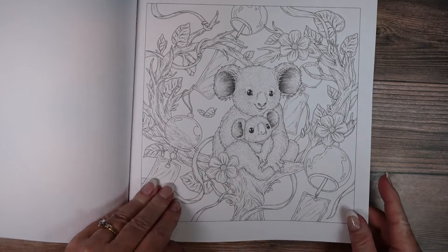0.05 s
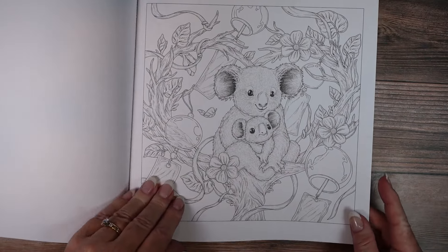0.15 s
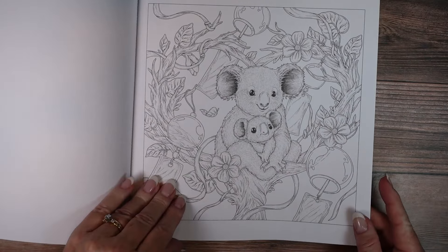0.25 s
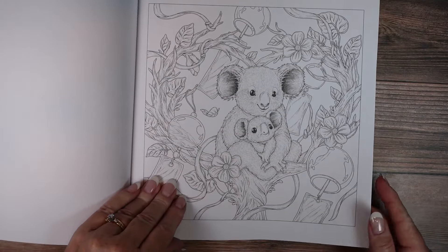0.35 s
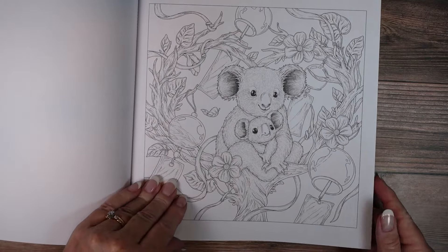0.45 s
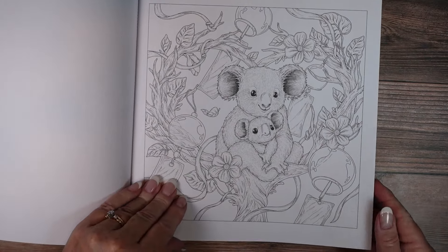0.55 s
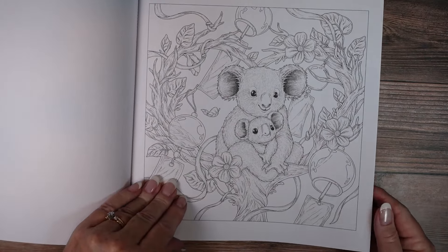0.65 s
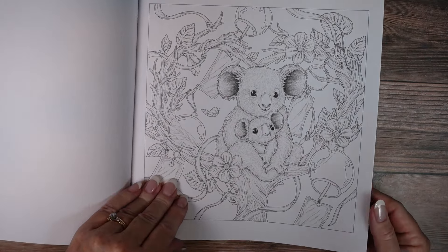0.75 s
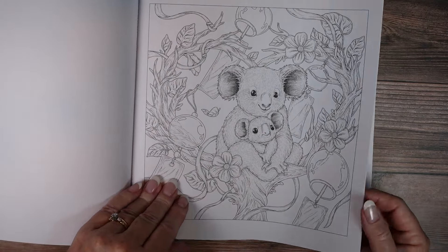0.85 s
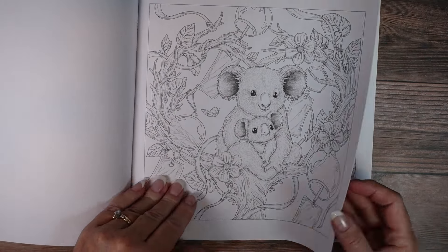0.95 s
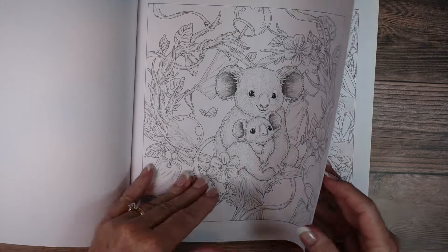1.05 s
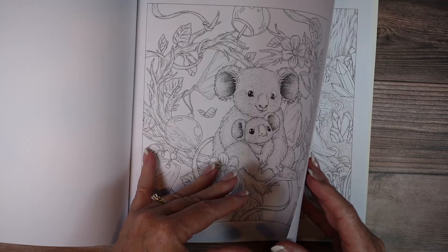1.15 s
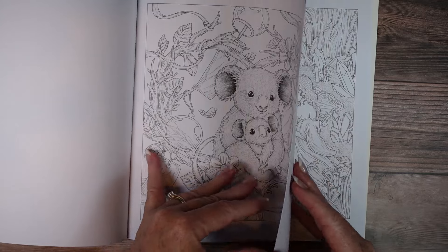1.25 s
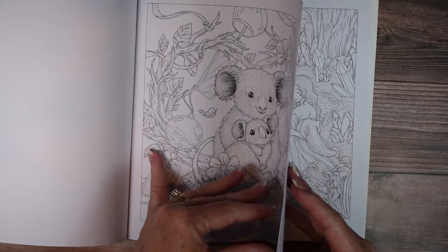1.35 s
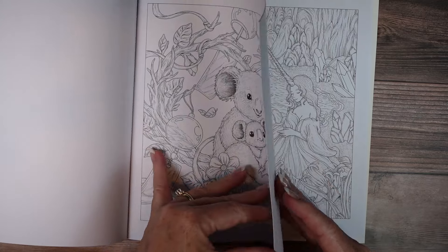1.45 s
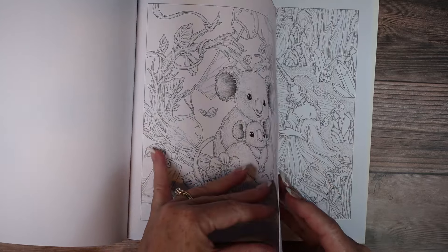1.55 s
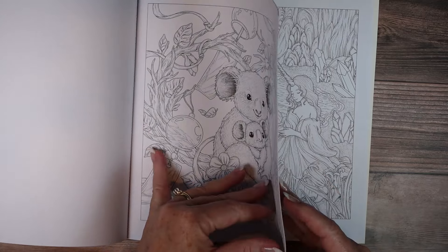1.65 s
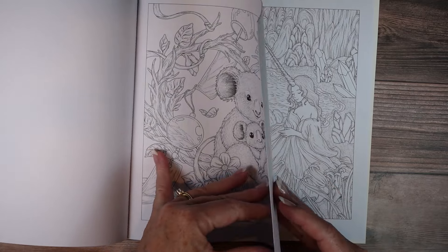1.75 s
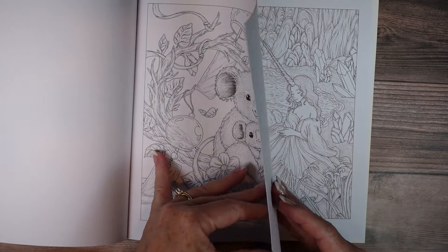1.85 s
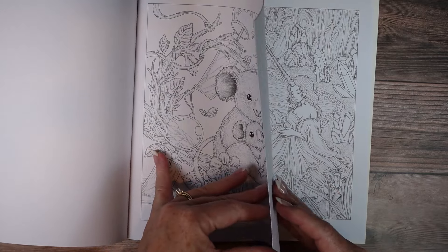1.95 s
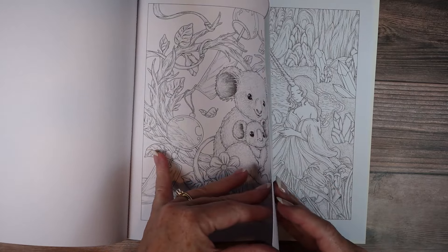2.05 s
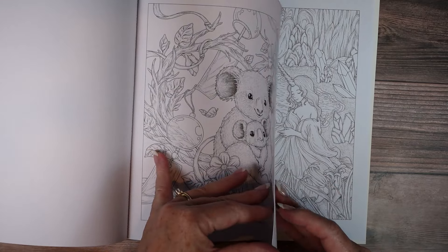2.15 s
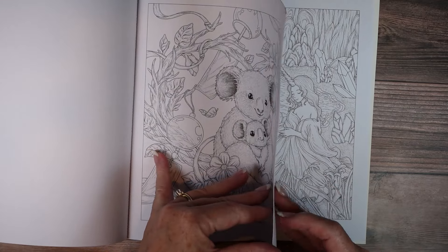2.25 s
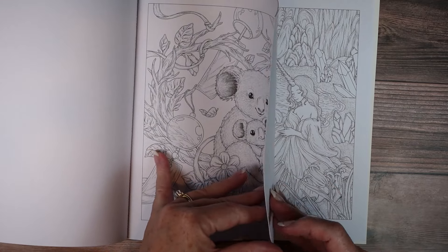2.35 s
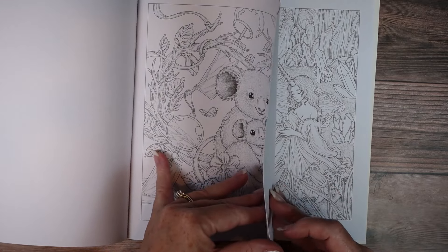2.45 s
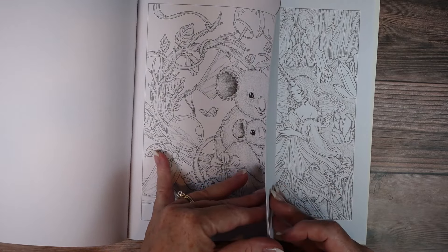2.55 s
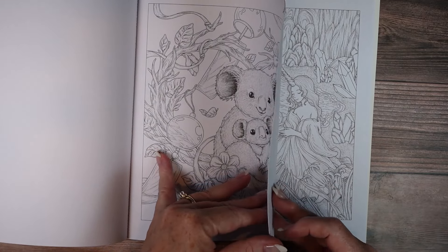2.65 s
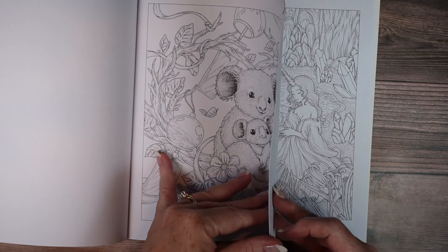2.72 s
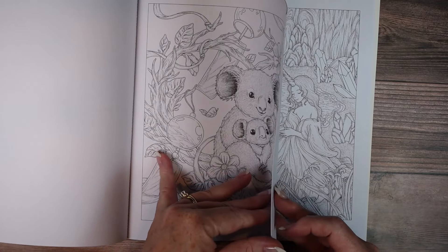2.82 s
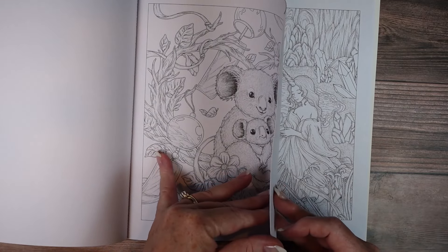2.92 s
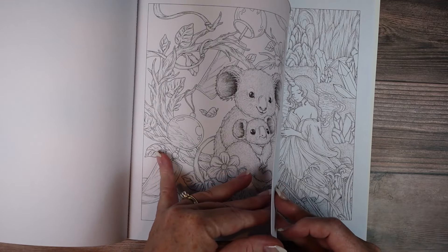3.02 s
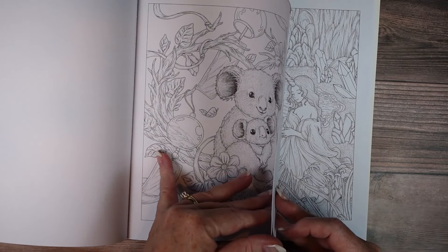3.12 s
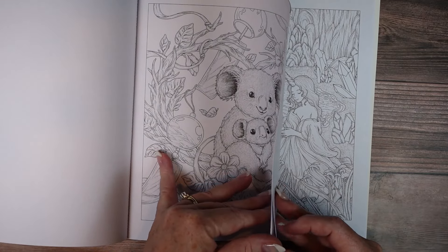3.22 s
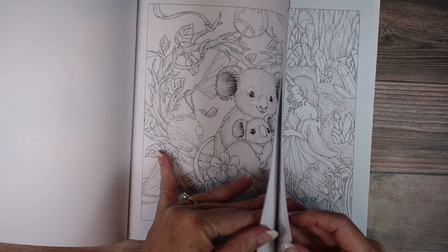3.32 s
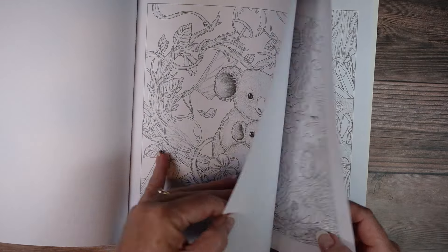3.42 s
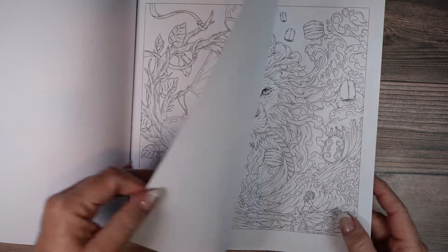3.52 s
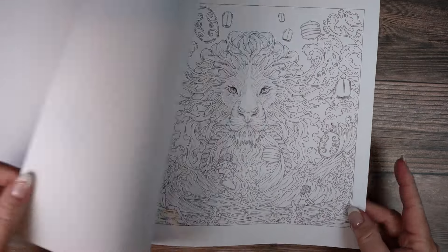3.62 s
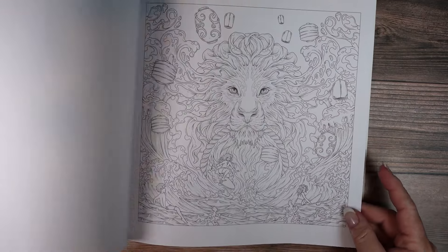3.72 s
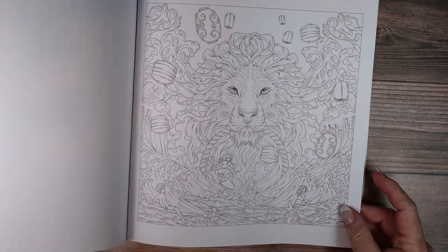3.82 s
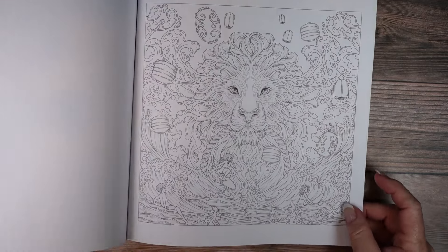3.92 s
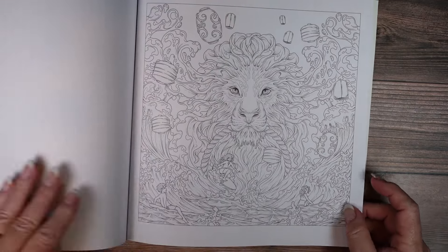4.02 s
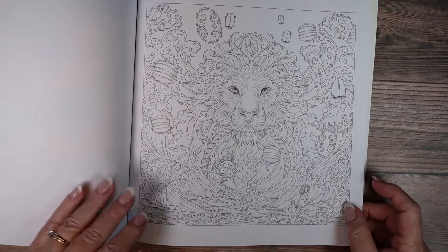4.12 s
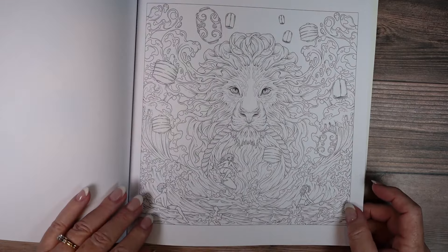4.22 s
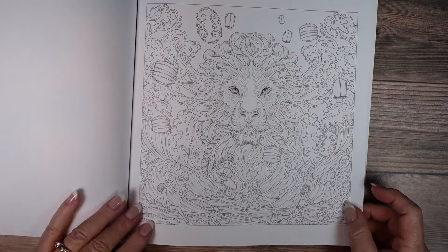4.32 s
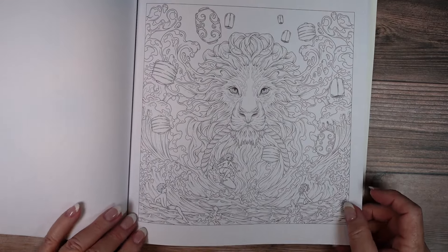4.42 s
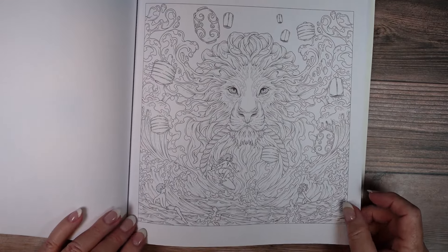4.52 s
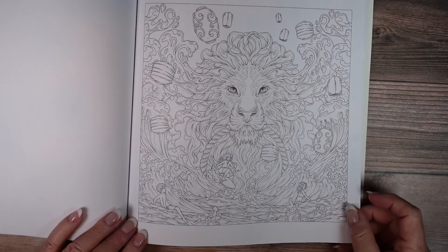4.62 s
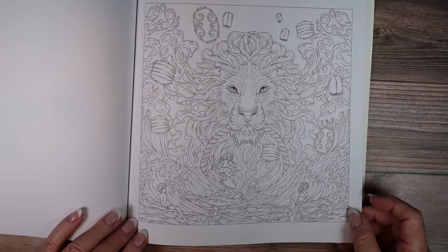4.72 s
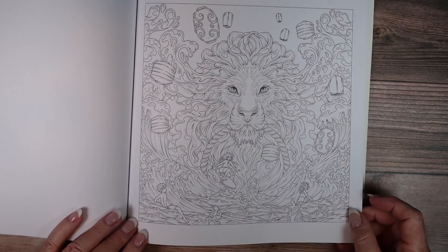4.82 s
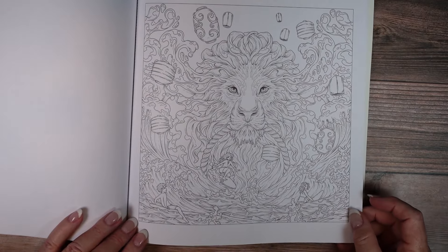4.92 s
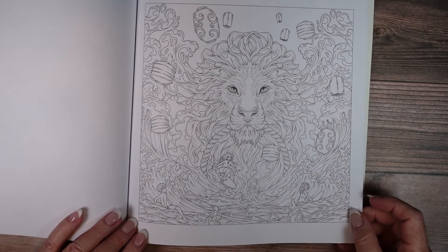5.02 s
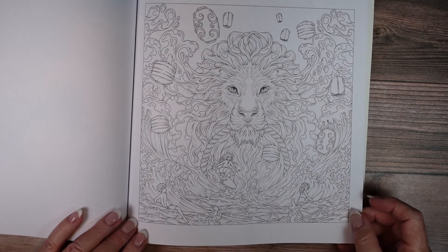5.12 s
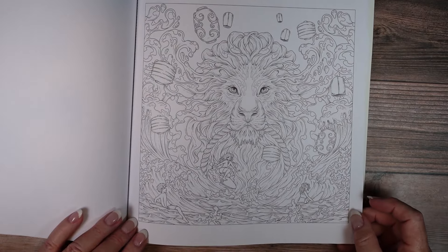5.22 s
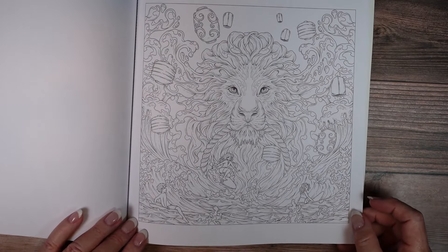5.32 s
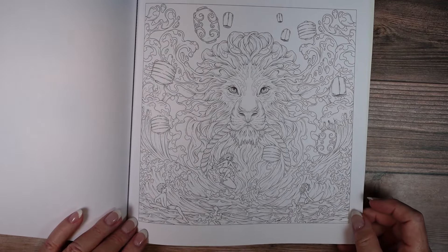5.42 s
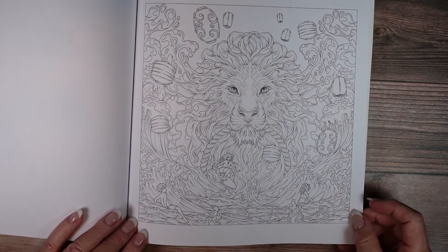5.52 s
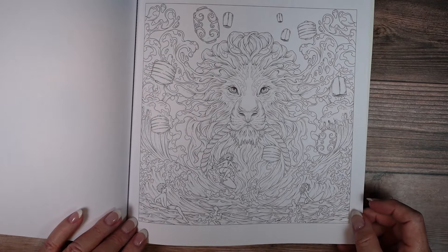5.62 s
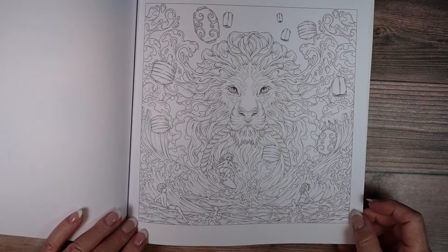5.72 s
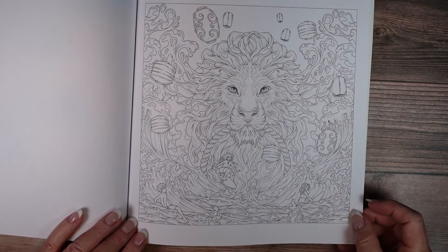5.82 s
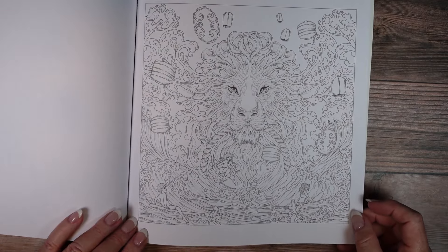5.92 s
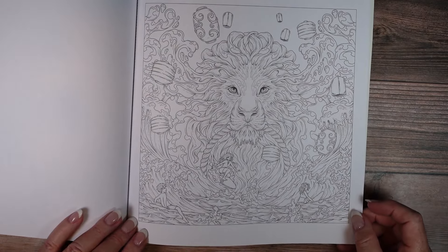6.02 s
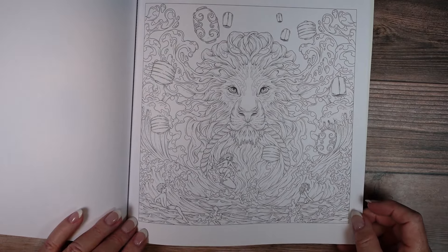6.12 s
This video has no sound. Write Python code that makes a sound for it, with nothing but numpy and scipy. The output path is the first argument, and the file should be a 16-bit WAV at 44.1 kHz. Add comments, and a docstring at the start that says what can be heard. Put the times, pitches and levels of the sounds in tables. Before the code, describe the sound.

A quiet small room, closely miked in stereo, with very faint hiss, thin distant machine tones and a low hum that swells and breaks off repeatedly. At 0.05 s there is a soft dull touch on the book, then almost nothing until about 0.9 s. From 0.95 to 1.4 s a page lifts in smooth, dry swishes. Between 1.4 and 2.9 s fingers part the sheets with small irregular rubs, crinkles and ticks, the crispest near 1.63 and 1.72 s. It is nearly still around 3 s. At 3.35-3.5 s the page turns in the loudest bright rustle, with a hard snap at 3.42 s. Softer sliding follows, then a sharp bright crack at 3.87 s. Airy smoothing strokes run from 4.0 to 4.7 s, with a muted tap near 4.27 s. After that only faint hiss and hum remain, with barely audible ticks around 5.1-5.3 s, until 6.1 s.

```python
"""At a wooden table in a quiet room, hands lift, part and turn the pages of a large paper book, close up.
Fingers and sheets slide as filtered noise, creases snap as short noise cracks,
and the book knocks on the table as decaying low rings.
Behind them lie shaped noise hiss, a low hum that swells and breaks off, and thin wavering tones."""
import sys
import numpy as np
from scipy import signal
from scipy.fft import rfft, irfft
from scipy.io import wavfile
from scipy.ndimage import uniform_filter1d

SR = 44100
rng = np.random.default_rng(int(sys.argv[2]) if len(sys.argv) > 2 else 0)


def store_wav(level_fs):
    """Save 16-bit WAV to argv[1]."""
    pcm = np.round(np.clip(np.atleast_2d(level_fs), -1, 1) * 32767)
    wavfile.write(sys.argv[1], SR, pcm.T.astype(np.int16))


N = 271656


def gain_of(db):
    """Amplitude factor for a level in dB."""
    return 10 ** (np.asarray(db) / 20)


def evened(x):
    """Scale to an RMS of 1."""
    return x / np.sqrt(np.mean(x ** 2) + 1e-20)


def read(points, hz):
    """Read a curve over frequency, with straight lines on a log-frequency axis."""
    f, value = np.transpose(points)
    return np.interp(np.log(hz + 1), np.log(f + 1), value)


def add(mix, start_s, sound):
    """Lay a sound into the mix at its start time, cut off at the end of the mix."""
    part = mix[round(start_s * SR):][:len(sound)]
    part += sound[:len(part)]


def resonate(x, hz, width_hz):
    """A two-pole resonance of gain 1 at its centre."""
    return signal.lfilter(*signal.iirpeak(hz, hz / width_hz, SR), x)


# Colour of the room hiss: (frequency [Hz], relative level per Hz [dB])
HISS_COLOUR = [(19, -46), (32, -11), (150, -2.5), (383, -6.5), (472, -6), (524, -5.5), (597, -0.5),
               (681, -1.5), (1090, -10), (1240, -6.5), (1450, -9.5), (1890, -10.5), (4830, -19),
               (14500, -25), (16500, -36.5)]
# Stereo likeness of the hiss: (frequency [Hz], left-right correlation [0 to 1])
HISS_LIKENESS = [(60, 1), (180, 0.57), (550, 0.08), (1650, 0.047), (4970, 0.054), (15000, 0.21)]
HISS_DB = -64  # RMS level


def hiss():
    """Room hiss: random short-time spectra with faint drifting patches, partly alike on both sides."""
    frames, hz = N // 512 + 5, np.fft.rfftfreq(2048, 1 / SR)
    a, b, c, d, patches = rng.standard_normal((frames, 1025, 5)).T
    patches = uniform_filter1d(patches, size=20, axis=0)  # across frequency
    patches = evened(uniform_filter1d(patches, size=10, axis=1))  # across time
    likeness = np.clip(read(HISS_LIKENESS, hz), -1, 1)[:, None]
    left = a + 1j * b
    right = likeness * left + np.sqrt(1 - likeness ** 2) * (c + 1j * d)
    spectra = np.array([left, right])
    spectra *= gain_of(read(HISS_COLOUR, hz)[:, None] + 0.6 * patches)
    noise = signal.istft(spectra, nperseg=2048, noverlap=1536)[1][:, :N]
    return gain_of(HISS_DB) * evened(noise)


# Swells of the low hum: (start [s], end [s], level grown to by the end, before waver [dB RMS])
HUM_SWELLS = [(.17, 0.748, -65.5), (.83, 1.0, -61), (1.07, 1.19, -65.5), (1.3, 1.807, -72),
              (1.84, 2.38, -66), (2.5, 2.8, -77.5), (2.85, 3.61, -66), (3.83, 3.9, -59.5),
              (3.95, 4.442, -63.5), (4.55, 4.98, -67), (5.04, 5.638, -62.5), (5.7, 6.1, -79)]
# Faint tones of some far machine: (frequency [Hz], bandwidth [Hz], level [dB RMS])
MACHINE_TONES = [(152, 6.6, -83.5), (206.3, 12.6, -81.5), (477, 4.1, -79.5), (602, 3.4, -78),
                 (1224, 2.5, -83), (10900, 142, -90.5)]
HUM_HZ, GROW_DB = 105.3, 5.5  # mean pitch; growth over each swell
SWELL_S, BREAK_S = 0.04, 0.055  # linear fades, centred on the start and the end
WAVER_DB, WAVER_HZ = 2.1, 1.8  # RMS wander of level and pitch


def slow_wander():
    """Noise smoothed twice, drifting slowly at an RMS of 1."""
    once = uniform_filter1d(rng.standard_normal(N), size=3000)
    return evened(uniform_filter1d(once, size=3000))


def hum():
    """A wavering low sine that swells and breaks off, plus narrow noise tones, alike on both sides."""
    now = np.arange(N) / SR
    drift, waver = slow_wander(), slow_wander()
    level = np.zeros(N)
    for start, end, end_db in HUM_SWELLS:
        left_to_grow = (end - np.clip(now, start, end)) / (end - start)
        fade_in = np.clip((now - start) / SWELL_S + 0.5, 0, 1)
        break_off = np.clip((end - now) / BREAK_S + 0.5, 0, 1)
        level += gain_of(end_db - GROW_DB * left_to_grow) * fade_in * break_off
    phase = 2 * np.pi * np.cumsum(HUM_HZ + WAVER_HZ * drift) / SR
    low = np.sqrt(2) * level * gain_of(WAVER_DB * waver) * np.sin(phase)
    thin = np.zeros(N)
    for hz, width_hz, db in MACHINE_TONES:
        thin += gain_of(db) * evened(resonate(rng.standard_normal(N), hz, width_hz))
    return low + thin


# Decay of the room: (frequency [Hz], time to fall 60 dB [s])
ROOM_DECAY = [(200, 0.18), (1000, .15), (4000, 0.12), (12000, 0.12)]


def room(x):
    """Reverb: sparse taps of random sign, separate for each side, each band dying at its own speed."""
    taps = np.zeros((2, SR // 2))
    slots = np.arange(120, SR // 2 - 20, 20)  # one tap in every 20 samples
    positions = slots + rng.integers(0, 20, (2, len(slots)))
    signs = rng.choice([-1.0, 1.0], (2, len(slots)))
    np.put_along_axis(taps, positions, signs, 1)
    hz, t, z = signal.stft(taps, SR, nperseg=256)
    decay = gain_of(-60 * t / read(ROOM_DECAY, hz)[:, None])
    tail = signal.istft(z * decay, SR, nperseg=256)[1]
    mono = x.mean(0)[None]
    return signal.fftconvolve(mono, tail / np.linalg.norm(tail[0]), axes=1)[:, :N]


# Fingertips and sheets knocking the hollow under the book:
# (time [s], relative level [dB], pitch [Hz], time to fall 60 dB [s])
KNOCK_HITS = [(.02, -60, 337, 0.039), (0.056, -24.5, 701, 0.047), (0.809, -48, 1583, 0.094),
              (1.027, -44, 690, 0.047), (1.634, -51, 384, 0.12), (1.83, -53.5, 710, 0.08),
              (2.126, -42.5, 640, 0.041), (2.128, -52, 378, 0.058), (2.3, -50, 370, 0.056),
              (2.311, -40.5, 661, 0.056), (2.452, -54.5, 797, 0.1), (2.612, -45, 747, 0.062),
              (2.736, -33, 793, 0.023), (3.095, -50, 642, 0.057), (3.245, -43, 780, 0.028),
              (3.336, -32, 660, 0.043), (3.344, -53.5, 228, .07), (3.52, -53.5, 368, 0.091),
              (3.86, -44.5, 172, 0.09), (3.872, -50, 349, 0.12), (3.875, -45.5, 554, 0.064),
              (4.263, -34, 623, 0.052), (4.297, -37, 648, 0.028), (4.603, -54, 637, .04)]


def knocks():
    """Soft blows on the hollow: each swells over a few milliseconds, then rings as sine and narrow noise."""
    out, t = np.zeros(N), np.arange(8192) / SR
    noises = rng.standard_normal((len(KNOCK_HITS), 8192))
    for (time_s, db, hz, t60), noise in zip(KNOCK_HITS, noises):
        rough = evened(resonate(resonate(noise, hz, 0.35 * hz), hz, 0.35 * hz))
        ring = np.sin(2 * np.pi * hz * t) + 0.45 * rough
        swell = 1 - np.exp(-(t / 0.0033) ** 2)
        decay = gain_of(db + 0.5 - 60 * t / max(t60, 0.01))
        add(out, time_s - 0.003, decay * swell * ring)  # the swell starts 3 ms early
    return out


# Rings and a few shallow dips in the colour of the open book, shared by slides and snaps:
# (frequency [Hz], width at half the lift or dip [Hz], relative lift, negative for a dip [dB])
BOOK_COLOUR = [(643, 130, 0.5), (770, 77, 5.5), (1294, 86, 6), (1620, 65, -1.5), (1936, 43, 3.5),
               (2310, 60, 4), (2820, 36, 8), (3454, 140, 5), (3750, 380, 2.5), (4000, 110, 3),
               (4440, 120, -1.5), (4570, 200, 1), (5300, 200, -1), (6720, 690, 3), (7200, 300, 2),
               (8080, 270, 3.5), (9130, 560, 1.5)]


def book_db(hz):
    """Colour of the open book in dB: the sum of its rounded peaks and dips."""
    return sum(db / (1 + (2 * (hz - f) / width) ** 2) for f, width, db in BOOK_COLOUR)


# Creases snapping and sheets slipping free: (time [s], relative level [dB], pitch [Hz],
# spread [octaves], relative treble [dB], crack decay constant [s])
CREASE_SNAPS = [(0.0444, -33.5, 1600, 0.81, 2, 0.016), (1.4304, -36, 5180, 0.45, -21, 0.0073),
                (1.613, -25, 2370, 0.25, -20, 0.0025), (1.6315, -18.5, 2400, 0.23, -33, 0.012),
                (1.6355, -20, 2820, 0.19, -32, 0.0028), (1.7156, -22.5, 3640, 0.19, -26, 0.005),
                (1.832, -35, 3530, 0.28, -14, 0.009), (1.99, -33.5, 5240, 0.14, -30, 0.0079),
                (2.123, -34, 3890, 0.4, 0, 0.006), (2.442, -51, 5500, 0.39, -15, 0.032),
                (2.5645, -38.5, 7980, 0.55, -24, 0.015), (2.614, -40, 5900, 0.53, -15, 0.0044),
                (2.703, -35, 2970, 0.25, -8, 0.0032), (2.7357, -26.5, 1860, 0.7, -17, 0.0056),
                (2.863, -41, 8040, 0.56, -20, 0.021), (3.094, -31.5, 2760, 0.69, -24, 0.0094),
                (3.242, -42, 2950, 0.7, -16, 0.0054), (3.3972, -19, 5000, 0.6, -10, 0.0046),
                (3.4178, -8, 2840, 0.55, -36, 0.0042), (3.473, -27, 3580, 0.12, -24, 0.013),
                (3.7055, -29.5, 1940, 0.49, -17, 0.004), (3.8703, -4.5, 5500, 0.45, 4, 0.0025),
                (3.875, -6.5, 3720, 0.23, -13, 0.0048), (3.948, -26.5, 3450, 0.7, -12, 0.013),
                (5.084, -47.5, 2200, 0.12, -25, 0.011), (5.115, -49.5, 2410, 0.069, -43, 0.024),
                (5.292, -47, 2300, 0.17, -40, 0.011)]


def snaps(tail_db=-26.5, tail_s=0.0087):
    """A crease gives way: a short crack of noise around its pitch, then the sheet shivers out."""
    out, t, hz = np.zeros(N), np.arange(4096) / SR, np.fft.rfftfreq(4096, 1 / SR) + 1
    noises = rng.standard_normal((len(CREASE_SNAPS), 4096))
    for (time_s, db, pitch_hz, octaves, treble_db, length_s), noise in zip(CREASE_SNAPS, noises):
        around = np.exp(-0.5 * (np.log2(hz / pitch_hz) / max(octaves, 0.05)) ** 2)
        around += 0.26 / (1 + (900 / hz) ** 4)  # broad floor above the lows
        body = around / (1 + (hz / 7500) ** 6)
        bright = 2.4 * gain_of(treble_db) / (1 + (6000 / hz) ** 6) * (7000 / hz) ** 1.65
        colour = (body + bright) * gain_of(1.6 * book_db(hz))
        crack = evened(irfft(rfft(noise) * colour))
        fade = np.exp(-t / max(length_s, 0.0005)) + gain_of(tail_db) * np.exp(-t / tail_s)
        attack = np.minimum(t / 0.000427, 1)
        add(out, time_s, gain_of(db - 12) * crack * fade * attack)
    return out


# Colour of sliding paper: (frequency [Hz], relative level per Hz [dB])
PAPER_COLOUR = [(320, -35), (540, -12), (806, -12), (985, -10.5), (3670, -4.5), (5480, -4), (9310, -7.5),
                (15100, -14.5), (15800, -20), (16500, -49.5)]
# Strokes of fingers and sheets; the four band levels are relative to the body band:
# (peak time [s], rise from -10 dB [s], fall to -10 dB [s], relative level [dB], boom [dB],
#  sheet flutter [Hz], low band [dB], air gap ring [Hz], upper band [dB], treble [dB])
HAND_STROKES = [(0.01, 0.022, 0.071, -61.5, 3.5, 2010, -5, 6350, -2, 1),
                (0.055, 0.014, 0.035, -55.5, 7, 1980.0, 3.5, 6100, 1.5, -1.5),
                (0.17, 0.093, 0.19, -64.5, -0.5, 1960.0, -4, 6300, 1.0, 2),
                (0.608, 0.3, 0.046, -83.5, -15, 1530, 16.5, 5300.0, 1, 2.0),
                (0.661, 0.083, 0.13, -79, 1, 1520, 10, 6340, 7, 7.5),
                (0.801, 0.021, 0.065, -77.5, 4, 1560, 16.5, 6100.0, 12.5, 7.5),
                (0.942, 0.05, 0.066, -55.5, -12.5, 1600, 2.5, 5700.0, -1, -4),
                (1.024, 0.07, 0.13, -55.5, -10.5, 2370, -1, 6040, -3, 0.5),
                (1.1, 0.027, 0.064, -47, -32, 2320, -11, 4930, -2.5, -5.5),
                (1.16, 0.044, 0.034, -52, -26, 2300, -9, 4870.0, -3.5, -10),
                (1.225, 0.049, 0.025, -48.5, -25, 2600.0, -14, 5300, -4.5, -10.5),
                (1.275, 0.034, 0.042, -58, -20.0, 2600.0, -7, 5200.0, -2, -5),
                (1.334, 0.017, 0.013, -54, -18, 2690.0, -14, 5000, 1.5, -11),
                (1.371, 0.031, 0.046, -56.5, -17, 1860, -11, 5400, 4.5, -7),
                (1.445, 0.0078, 0.054, -54.5, -10.5, 2260.0, -7, 5100, 1.5, -7),
                (1.519, 0.0067, 0.045, -53, -11.5, 2240, -13, 5140, -3.5, -12),
                (1.591, 0.062, 0.063, -59.5, -6.0, 2390.0, -7.0, 5250, 7, -8),
                (1.636, 0.034, 0.034, -48, -3, 2360, 1, 5250.0, 2, -8.5),
                (1.716, 0.037, 0.065, -48.5, -6, 1910, -0.5, 5300.0, 2, -6),
                (1.835, 0.012, 0.059, -58.5, -1.5, 1650.0, -6.5, 5320.0, 0.0, -6.5),
                (1.889, 0.022, 0.016, -62.5, -4, 1700.0, -4.5, 5280.0, 12, -4),
                (1.954, 0.046, 0.028, -56.5, -17.5, 1850, -14, 5300.0, -1.5, -14),
                (1.988, 0.014, 0.077, -64.5, 2.5, 1860, -1.5, 5400, 4.5, -5.0),
                (2.066, 0.01, 0.04, -60.5, -21, 1600.0, -7, 5430, 4.5, -7),
                (2.12, 0.043, 0.037, -54.5, -8, 1580, -9, 5540, 1.5, -4),
                (2.183, 0.022, 0.053, -63.5, -5, 1700.0, -9, 6400.0, -3, -7),
                (2.284, 0.042, 0.053, -56, -9, 1800.0, -10.5, 5660, 4.5, -2),
                (2.321, 0.01, 0.038, -54.5, -0.5, 1460.0, -12, 5800, 5.0, -3.0),
                (2.38, 0.011, 0.044, -63.5, -9, 1810.0, -10, 5790.0, -1, -6),
                (2.453, 0.02, 0.017, -62.5, 1, 1960.0, -3, 5660.0, 4.5, -10),
                (2.502, 0.012, 0.024, -59, -12, 1790, -8, 5380, -0.5, -5.5),
                (2.54, 0.05, 0.17, -66.5, -9, 1460.0, -8, 5800, -7, -6),
                (2.616, 0.005, 0.043, -62, 3, 1960.0, 0, 5790.0, 7, -5),
                (2.65, 0.037, 0.043, -61.5, 1.5, 1900, -0.5, 5760, 5.5, -1),
                (2.74, 0.0091, 0.026, -54.5, -1, 1920.0, 3, 5740, 4.5, -10),
                (2.79, 0.022, 0.052, -68, -0.5, 1870.0, -1, 5400, 4.5, -3),
                (2.861, 0.006, 0.066, -63, -7.5, 1950.0, -4.5, 5800, -11, -4),
                (2.97, 0.1, 0.14, -78, 1, 1700, 2, 5900, -2, -1),
                (3.01, 0.012, 0.045, -64.5, -8, 1900, -7, 5900, -2, -3),
                (3.099, 0.005, 0.04, -62.5, -4.5, 1900.0, 5, 5840.0, -2.0, -0.5),
                (3.141, 0.012, 0.062, -69.0, -4, 1460.0, 2.5, 5660.0, -0.5, -1.5),
                (3.248, 0.005, 0.099, -65.5, 1, 2090.0, 4.5, 5600, 5, -2),
                (3.346, 0.038, 0.019, -46, -3.5, 1840, -2.5, 5430, 1.5, -5.5),
                (3.41, 0.043, 0.054, -41, -14, 2370, -2.5, 5560, 0, 0),
                (3.478, 0.027, 0.071, -41.5, -9.5, 2160, -8.5, 5300.0, -4.5, -1.5),
                (3.57, 0.032, 0.076, -51.5, -6, 2210, 1, 5130, 1.5, 1.5),
                (3.642, 0.04, 0.089, -50.0, -10.5, 2350.0, 0.5, 5570, -2, -10),
                (3.8, 0.084, 0.12, -51.5, -12, 2300.0, -7.5, 5400.0, 0, -4),
                (3.878, 0.012, 0.05, -41.5, -19.0, 2300.0, -14, 5700.0, -3, -5.5),
                (3.962, 0.034, 0.068, -51.5, -15, 2170, -9, 6330, -0.5, 6),
                (4.035, 0.057, 0.05, -48, -19.5, 2150, -6.5, 6330, -0.5, -0.5),
                (4.135, 0.063, 0.053, -51.0, -19, 2300.0, -8, 5260, -2.5, -0.5),
                (4.276, 0.13, 0.078, -54, -15, 2300, -3, 4570, 0.5, -4.5),
                (4.337, 0.065, 0.17, -66, -0.5, 2350.0, 2.5, 4900, 11.5, 11.5),
                (4.434, 0.059, 0.06, -48, -28, 2240, -9, 5750.0, -3.5, -2.5),
                (4.538, 0.012, 0.095, -57.5, -23, 2650, -7, 5000.0, -12, -6.5),
                (4.617, 0.053, 0.081, -49.5, -24, 2690.0, -15.5, 4430, -3, -8.5),
                (4.78, 0.12, 0.16, -75.0, -5, 1830.0, -1, 6370.0, -3.5, -2)]
TREBLE_STEEP = 1.13  # the treble needs speed: its bell falls this many times as steeply in dB


def slides(grains_per_s=5000, clump_db=1.0):
    """Dense tiny fibre catches over a smooth scrape, coloured by paper, book, fluttering sheet and air gap."""
    catches = gain_of(2.8 * np.minimum(rng.exponential(1, N), 4))
    catches *= rng.random(N) < grains_per_s / SR
    # the grip comes in bunches
    clumps = gain_of(clump_db * evened(uniform_filter1d(rng.standard_normal(N), size=350)))
    drive = clumps * (0.9 + 0.43 * evened(catches)) * rng.standard_normal(N)
    hz, t, z = signal.stft(evened(drive), SR, nperseg=512, noverlap=448)
    f = hz[:, None] + 1

    (peak, rise, fall, level_db, boom_db, flutter_hz,
     low_db, gap_hz, upper_db, treble_db) = np.transpose(HAND_STROKES)
    # each stroke swells and dies as a bell, with its own rise and fall
    since = t[:, None] - peak
    bell_db = -10 * np.minimum((since / np.where(since < 0, rise, fall)) ** 2, 6)
    power = gain_of(2 * (level_db + bell_db))
    total = power.sum(1)
    weight = power / total[:, None]

    # narrow rings of the bending sheet, each lasting a fraction of a second
    streaks_db = 2.2 * evened(uniform_filter1d(rng.standard_normal(z.shape), size=80, axis=1))
    flutter = 8 * np.exp(-(np.log2(f / flutter_hz) / 0.17) ** 2)
    gap = 8 * np.exp(-(np.log2(f / gap_hz) / 0.11) ** 2)
    # as the sheets shift, one ring fades out and the next fades in: no glide between them
    rings_db = (flutter + gap) @ weight.T
    colour = gain_of(read(PAPER_COLOUR, f) + book_db(f) + rings_db + streaks_db)

    # boom, low, body, upper and treble bands each get their own power, blending over the edges
    edges_hz = (1150, 2800, 4300, 7700)
    under = [0] + [1 / (1 + (f / edge) ** 12) for edge in edges_hz] + [1]
    body_db = 0 * peak
    shares = [np.sqrt(weight @ gain_of(2 * db)) for db in (boom_db, low_db, body_db, upper_db)]
    treble_power = weight * gain_of(2 * (treble_db + (TREBLE_STEEP - 1) * bell_db))
    shares.append(np.sqrt(treble_power.sum(1)))
    shape = 0
    for below, above, share in zip(under, under[1:], shares):
        band = (above - below) * colour
        shape = shape + share * band / np.sqrt(np.mean(band ** 2, 0))
    rub = signal.istft(z * shape, SR, nperseg=512, noverlap=448)[1][:N]
    return rub * np.interp(np.arange(N) / SR, t, np.sqrt(total))


# Where the hands work: (time [s], left minus right level [dB])
HAND_PLACE = [(0.0, 0.5), (0.3, 3), (0.9, 0.5), (3.501, 0), (3.75, 2), (3.97, 2), (4.1, 2), (4.6, 0),
              (5.5, 1)]


def place():
    """Left and right gains that follow the hands, each side taking half the level difference."""
    time_s, pan_db = np.transpose(HAND_PLACE)
    pan_now = np.interp(np.arange(N) / SR, time_s, pan_db)
    return gain_of(np.multiply.outer([0.5, -0.5], pan_now))


def scene():
    """Slides and snaps follow the hands, knocks sit in the middle; room, hiss and hum lie around them."""
    paper = (slides() + snaps()) * place() + knocks()
    return paper + gain_of(-8.0) * room(paper) + hiss() + hum()


def record(dry):
    """A steep low-pass at 15850 Hz over the whole scene."""
    lowpass = signal.firwin(511, 15850, window=("kaiser", 9), fs=SR)
    return signal.oaconvolve(dry, lowpass[None], "same")


dry = scene()
out = record(dry)
store_wav(out)
```